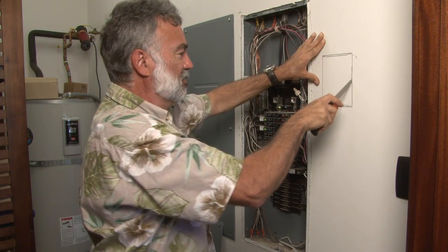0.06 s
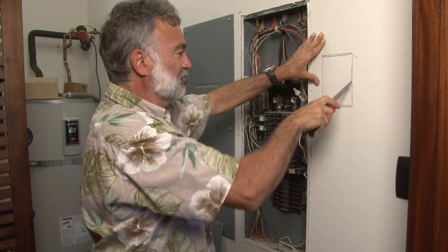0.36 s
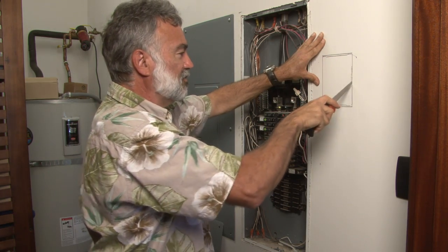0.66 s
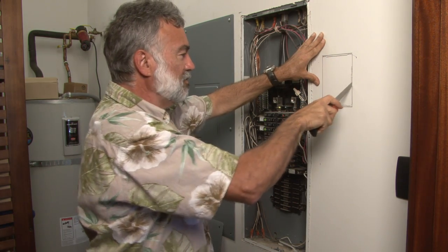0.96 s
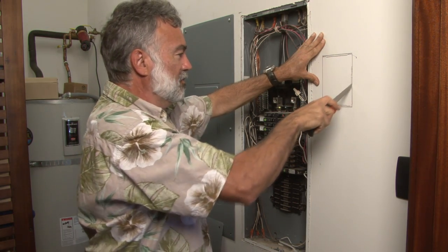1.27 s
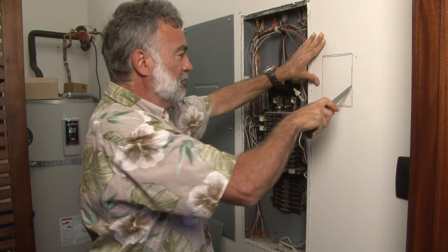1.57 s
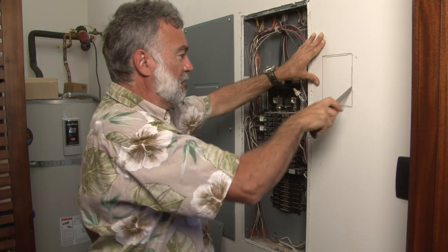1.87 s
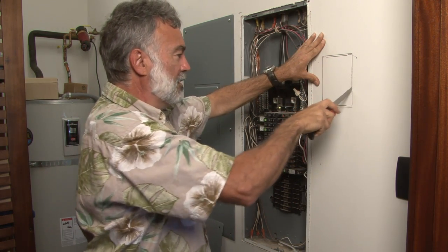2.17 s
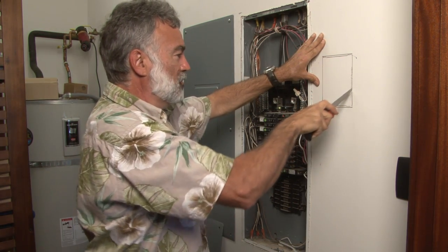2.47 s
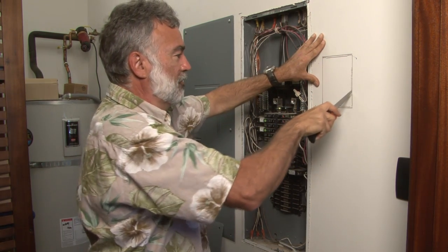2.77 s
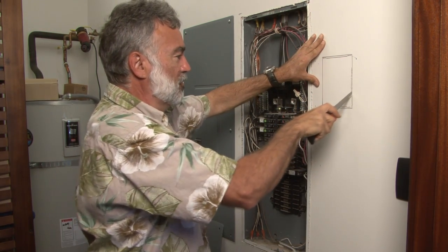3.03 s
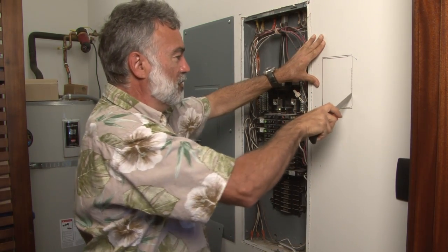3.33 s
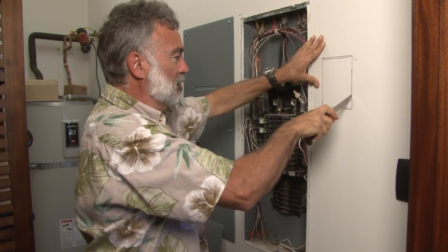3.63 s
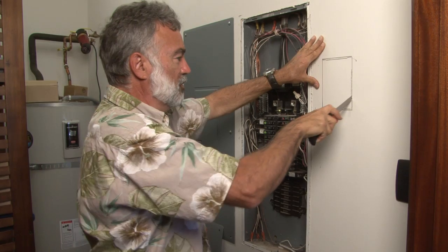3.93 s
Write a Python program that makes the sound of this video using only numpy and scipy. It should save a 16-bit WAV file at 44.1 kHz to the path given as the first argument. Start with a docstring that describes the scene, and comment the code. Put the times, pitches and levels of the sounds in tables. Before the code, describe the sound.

Close up in a small room, a hand saw works quickly through drywall. Louder cutting strokes alternate with softer return strokes, mixing a crumbly scrape with the low, hollow thudding of the wall panel throughout.

```python
"""Rasping, booming strokes, a little over four cycles a second: a jab saw cuts wallboard in a closet.
Each tooth's impact crumbles the gypsum and excites the modes of the panel; the scraping rings the blade,
and stick-slip friction sets the whole panel booming. Two larger crumbs snap off; a faint rumble lies below.
One close microphone feeds two channels at different gains, and the hotter one overloads."""
import sys
import numpy as np
from scipy import signal
from scipy.io import wavfile
from scipy.ndimage import uniform_filter1d

SR = 44100
rng = np.random.default_rng(int(sys.argv[2]) if len(sys.argv) > 2 else 0)


def output_pcm(signal):
    """Save a mono or channel-first signal as 16-bit PCM at the path in sys.argv[1].

    Samples are clipped to [-1, 1] before scaling.
    """
    pcm = np.clip(np.atleast_2d(signal).T, -1, 1) * 32767
    wavfile.write(sys.argv[1], SR, np.round(pcm).astype(np.int16))


N = 176400
T = np.arange(N) / SR

# All levels in the tables are relative.
# Spectrum of the background rumble: f/Hz, level/dB
RUMBLE_SPECTRUM = [(15, -8.5), (35, -23), (70, -11.5), (150, -12.5), (500, -33.5), (2000, -47),
                   (16000, -64)]
# Cutting and return strokes: start t/s, fastest t/s, fade t/s, grit level/dB, knock level/dB,
# hollow ring level/dB, boom level/dB, boom delay after the fastest moment t/s
CUT_STROKES = [(0.047, 0.086, 0.021, -34.0, -24, -33, -15, 0.017),
               (0.259, 0.308, 0.027, -28, -15.5, -19.5, -6, 0.027),
               (0.488, 0.55, 0.029, -32.5, -17, -26.5, -15.0, -0.015),
               (0.741, 0.788, 0.02, -29, -18.5, -25.5, -13.5, 0.0018),
               (0.955, 1.006, 0.027, -32.5, -19, -21.0, -10.5, 0.021),
               (1.183, 1.235, 0.032, -28, -15.5, -18, -8, 0.018),
               (1.426, 1.473, 0.032, -36, -25.5, -27, -11, -0.0032),
               (1.663, 1.705, 0.026, -29, -16.5, -21.5, -7.5, 0.013),
               (1.886, 1.94, 0.022, -28.5, -16.5, -15, -10, 0.0021),
               (2.125, 2.169, 0.02, -31, -21, -26.5, -14, -0.014),
               (2.354, 2.409, 0.027, -31.0, -18.5, -18.0, -18.5, 0.0003),
               (2.592, 2.645, 0.026, -30.5, -16.5, -18.5, -7.5, 0.0015),
               (2.83, 2.878, 0.029, -31.5, -19, -19, -7.5, -0.015),
               (3.057, 3.124, 0.027, -33.5, -22.5, -35.5, -15.5, -0.0021),
               (3.312, 3.349, 0.021, -30.5, -16, -22.0, -11.5, 0.024),
               (3.536, 3.583, 0.023, -31.5, -17.0, -20, -14, 0.012),
               (3.78, 3.808, 0.023, -31.5, -22, -29, -16, 0.016)]
RETURN_STROKES = [(0.146, 0.19, 0.028, -40.5, -25, -32.5, -10.5, 0.016),
                  (0.386, 0.423, 0.043, -37.5, -23.5, -24, -8.0, 0.015),
                  (0.618, 0.657, 0.035, -43, -29.5, -37.5, -23.5, 0.0076),
                  (0.841, 0.879, 0.028, -37.0, -22.5, -30.5, -13, 0.016),
                  (1.074, 1.117, 0.034, -38, -25.5, -26, -8.5, 0.017),
                  (1.311, 1.346, 0.035, -38, -20, -30, -13.5, 0.01),
                  (1.544, 1.571, 0.023, -42.0, -32, -31.5, -20.0, -0.0038),
                  (1.768, 1.805, 0.033, -36, -23.5, -28.5, -17.5, 0.018),
                  (1.996, 2.039, 0.037, -39.5, -25, -24, -7.5, 0.02),
                  (2.241, 2.274, 0.031, -41.5, -22.5, -40, -11.5, 0.018),
                  (2.474, 2.52, 0.029, -39.5, -24.5, -23.5, -19.0, 0.0011),
                  (2.714, 2.752, 0.038, -40.5, -24.5, -26.0, -10.5, 0.018),
                  (2.938, 2.98, 0.036, -38.5, -22.5, -27, -13.0, 0.0066),
                  (3.191, 3.227, 0.028, -47, -29, -37.5, -22.5, 0.012),
                  (3.414, 3.454, 0.032, -39.5, -24, -24.5, -19.0, -0.032),
                  (3.651, 3.681, 0.019, -41, -30, -32.5, -25.5, 0.021),
                  (3.896, 3.931, 0.03, -43, -35.5, -39.5, -19.5, 0.0043)]
# Spectra of crumbling gypsum in each direction: f/Hz, level/dB
CUT_GRIT_SPECTRUM = [(100, -2), (700, 4), (1300, 1.5), (1850, 3), (2600, -4), (3600, -8.5), (5000, -9.5),
                     (7000, -14.5), (9500, -20.5), (13000, -12.5), (16000, -21.5)]
RETURN_GRIT_SPECTRUM = [(100, -18), (700, 7), (1300, 1), (1850, -1.5), (2600, -6), (3600, -8), (5000, -8.5),
                        (7000, -12.5), (9500, -18), (13000, -11), (16000, -20)]
# Modes of the steel blade: f/Hz, level/dB
BLADE_MODES = [(1556, -66.5), (1658, -72.5), (1760, -45.5), (1825, -45.5), (2030, -48), (2186, -71.5),
               (2369, -59.5), (2541, -55), (2654, -47)]
# Modes of the panel: f/Hz, level/dB, T60/s
PANEL_MODES = [(116.4, -28, 0.06), (164, -18, 0.13), (177.1, 3, 0.38), (210, -4.5, 0.066),
               (249.5, -6, 0.19), (315.4, -3, 0.033), (305.6, 4.5, 0.04), (370.4, -5.5, 0.076),
               (466.4, -3, 0.14), (572.5, -4, .14), (643, 1.5, 0.055), (703, -14, 0.17),
               (752.3, -8.5, 0.092), (830, -5.5, 0.061), (944.3, -18, 0.25)]
# Spectrum of the panel's dull thud: f/Hz, level/dB
THUD_SPECTRUM = [(20, -39), (65, -12), (130, -4.5), (300, 4.5), (550, -2.5), (800, -13), (1200, -19),
                 (2000, -28), (4000, -49), (16000, -69)]
# Reverberation time of the closet: f/Hz, T60/s
CLOSET_DECAY = [(100, 0.68), (500, 0.11), (2000, 0.32), (6000, 0.21), (16000, 0.067)]
# Spectrum of the board's core breaking: f/Hz, level/dB
CRUNCH_SPECTRUM = [(60, -36.5), (200, 6), (320, 2.5), (450, 1), (600, 4), (800, -9.5), (1100, -15),
                   (1600, -26.5), (3000, -36), (16000, -66)]
# Larger crumbs snapping off: t/s, level/dB
CRUMB_SNAPS = [(1.488, -30), (2.778, -39)]

CUT_LEAD_S, RETURN_LEAD_S, GRIT_LEAD_S = .0057, .0039, .0059  # knocks and grit peak before top speed
GRIT_ROOM_DB, KNOCK_ROOM_DB = -6, -14  # reverberant relative to direct sound


def amp(db):
    """Amplitude ratio for a level in decibels."""
    return 10 ** (np.asarray(db) / 20)


def unit(x):
    """Normalisation to an rms of 1."""
    return x / np.sqrt(np.mean(x ** 2) + 1e-20)


def read(points, hz):
    """Interpolation on a logarithmic frequency axis."""
    f, value = np.transpose(points)
    return np.interp(np.log(hz + 1), np.log(f + 1), value)


def ring(x, response):
    """Convolution with an impulse response of unit energy."""
    return signal.fftconvolve(x, response / np.linalg.norm(response))[:N]


def colour(x, spectrum):
    """Minimum-phase filtering to the given spectral shape."""
    log_gain = np.log(amp(read(spectrum, abs(np.fft.fftfreq(4096, 1 / SR)))))
    transfer = np.exp(np.conj(signal.hilbert(log_gain)))
    return ring(x, np.fft.ifft(transfer).real[:2048])


def drift(size):
    """Random fluctuation of rms 1, smoothed over size samples."""
    return unit(uniform_filter1d(uniform_filter1d(rng.standard_normal(N), size), size))


def rumble():
    """Stationary noise with its energy at low frequencies."""
    return amp(-29) * colour(rng.standard_normal(N), RUMBLE_SPECTRUM)


def swell(strokes, levels_db, catch_db, power=1, lead_s=0, catch_s=.016):
    """Stroke envelopes add in energy: the teeth catch, the sound swells to a peak and dies away."""
    energy = np.zeros(N)
    for (start, fastest, fade, *_), db in zip(strokes, levels_db):
        peak = fastest - lead_s
        catch = np.clip((T - start) / catch_s + .5, 0, 1)
        rise = amp(catch_db * np.clip((peak - T) / (peak - start), 0, 1))
        fall = np.exp(-.5 * (np.maximum(T - peak, 0) / fade) ** 1.8)
        energy += (amp(db) * (catch * rise * fall) ** power) ** 2
    return np.sqrt(energy)


def teeth(effort, top_hz, slowest=.45, jitter=.22, spread_db=6):
    """An impulse train, one click a tooth, whose rate is proportional to blade speed."""
    speed = slowest + (1 - slowest) * effort
    passed = np.cumsum(top_hz * speed * np.exp(jitter * drift(size=120))) / SR
    strikes = np.diff(np.floor(passed), prepend=0) > 0
    clicks = strikes * amp(spread_db * np.clip(rng.standard_normal(N), -2, 2))
    local_rms = np.sqrt(abs(uniform_filter1d(clicks ** 2, size=1600)) + 1e-6)
    return clicks / local_rms


def grit(bites, grains_per_s=22000, spread_db=2, crumble_s=.0043, steady=.65):
    """Brittle fracture: gypsum crumbles in tiny grains, most strongly just after each bite."""
    crumble = unit(signal.lfilter([1], [1, -np.exp(-1 / (crumble_s * SR))], bites))
    grains = rng.standard_normal(N) * (rng.random(N) < grains_per_s / SR)
    grains *= amp(spread_db * rng.standard_normal(N))
    return unit(grains * (steady + (1 - steady) * crumble))


def blade(scrape, t60_s=.11):
    """Resonance: scraping excites the damped modes of the steel blade."""
    t = T[:SR // 4]
    modes = sum(amp(db - 60 * t / t60_s) * np.sin(2 * np.pi * (hz * t + rng.random()))
                for hz, db in BLADE_MODES)
    return amp(-9.5) * ring(scrape, modes)


def shifting_timbre(rasp, depth_db=2):
    """Spectral modulation: the colour of the rasp shifts as the blade moves through the cut."""
    bands = signal.stft(rasp, nperseg=256)[2]
    patches = uniform_filter1d(rng.standard_normal(bands.shape), size=3, axis=0)
    patches = unit(uniform_filter1d(patches, size=16, axis=1))
    return signal.istft(bands * amp(depth_db * (patches - .5)), nperseg=256)[1][:N]


def panel(force):
    """Impact excitation: tooth knocks give a dull thud and ring the modes of the board."""
    t = T[:SR // 3]
    modes = sum(amp(db - 60 * t / t60) * np.sin(2 * np.pi * (hz * t + rng.random()))
                for hz, db, t60 in PANEL_MODES)
    return amp(2) * ring(force, modes) + amp(-4) * colour(force, THUD_SPECTRUM)


def hollow_ring(drive, hz=361.4, wander_hz=4.96, decay_s=.006):
    """Forced vibration: one panel mode sings with the rubbing and lingers briefly after it."""
    pole = np.exp(-1 / (decay_s * SR))
    envelope = signal.lfilter([1 - pole], [1, -pole], drive)
    cycles = np.cumsum(hz + wander_hz * drift(size=500)) / SR
    return amp(2) * envelope * np.sqrt(2) * np.sin(2 * np.pi * cycles)


def closet(x, first_echo_s=.003):
    """Reverberation: dense reflections from near walls, each band decaying at its own rate."""
    n = SR // 2
    echoes = rng.standard_normal(n) * (rng.random(n) < .1) * (T[:n] > first_echo_s)
    hz, t, bands = signal.stft(echoes, SR, nperseg=256)
    decay = amp(-60 * t / read(CLOSET_DECAY, hz)[:, None])
    return ring(x, signal.istft(bands * decay, SR, nperseg=256)[1])


def saw(strokes, spectrum, teeth_hz, catch_db, lead_s, knock_cutoff_hz):
    """Common excitation: in the strokes of one direction, the same teeth drive rasp and knocks."""
    grit_db, knock_db, hollow_db = np.transpose(strokes)[3:6]
    effort = swell(strokes, np.zeros(len(strokes)), catch_db)
    bites = teeth(effort, teeth_hz)
    scrape = grit(bites) * swell(strokes, grit_db, catch_db, lead_s=GRIT_LEAD_S)
    rasp = shifting_timbre(colour(scrape, spectrum) + blade(scrape))
    force = bites - uniform_filter1d(bites, size=600)  # the steady push makes no sound
    force *= swell(strokes, knock_db, catch_db, power=.92, lead_s=lead_s)
    knocks = panel(signal.lfilter(*signal.butter(1, knock_cutoff_hz, fs=SR), force))
    room = closet(amp(GRIT_ROOM_DB) * rasp + amp(KNOCK_ROOM_DB) * knocks)
    return rasp + knocks + hollow_ring(swell(strokes, hollow_db, catch_db)) + room


def crunch(width_s=.02):
    """Fracture of the core: a burst of noise where each cutting stroke knocks hardest."""
    envelope = sum(amp(knock_db) * np.exp(-((T - fastest + CUT_LEAD_S) / width_s) ** 2)
                   for _, fastest, _, _, knock_db, *_ in CUT_STROKES)
    burst = amp(-2.5) * colour(envelope * rng.standard_normal(N), CRUNCH_SPECTRUM)
    return burst + amp(KNOCK_ROOM_DB) * closet(burst)


def boom(strokes, stretch=1, hz=119.4, sag_hz_per_s=69.4, wander_hz=5):
    """Stick-slip friction locks to the lowest panel mode, whose pitch sags as the push eases."""
    rise_s, fall_s = .023 * stretch, .037 * stretch
    wander = wander_hz * drift(size=700)
    out = np.zeros(N)
    for _, fastest, *_, db, delay in strokes:
        near = abs(T - fastest - delay) < .15
        t = T[near] - fastest - delay
        cycles = np.cumsum(hz - sag_hz_per_s * t + wander[near]) / SR + rng.random()
        envelope = np.where(t < 0, np.exp(-(t / rise_s) ** 2), 1 / np.cosh(1.75 * t / fall_s))
        out[near] += amp(db) * np.sqrt(2) * envelope * np.sin(2 * np.pi * cycles)
    return out


def snaps(decay_s=.00072):
    """Sudden fracture: larger crumbs break away with short, bright cracks."""
    envelope = sum(amp(db) * (T >= start) * np.exp(-abs(T - start) / decay_s)
                   for start, db in CRUMB_SNAPS)
    crack = colour(envelope * rng.standard_normal(N), [(500, -18), (4000, -7), (7500, 12), (16000, -3)])
    return crack + amp(GRIT_ROOM_DB) * closet(crack)


def scene():
    """Superposition: all sources sum at one microphone, which feeds both channels."""
    cuts = saw(CUT_STROKES, CUT_GRIT_SPECTRUM, teeth_hz=260, catch_db=-14,
               lead_s=CUT_LEAD_S, knock_cutoff_hz=830)
    cuts += boom(CUT_STROKES) + crunch()
    returns = saw(RETURN_STROKES, RETURN_GRIT_SPECTRUM, teeth_hz=341.8, catch_db=-6,
                  lead_s=RETURN_LEAD_S, knock_cutoff_hz=594)  # teeth sliding backwards knock more dully
    mic = rumble() + cuts + returns + boom(RETURN_STROKES, stretch=1.21) + snaps()
    mic = signal.lfilter(*signal.butter(1, 20, "high", fs=SR), mic)
    return amp(2) * np.array([mic, mic])


def record(dry, right_gain_db=7, cutoff_hz=15800):
    """Clipping: the hotter right channel overloads; a low-pass filter then limits the bandwidth."""
    clipped = np.clip(dry * amp([[0], [right_gain_db]]), -1, 1)
    lowpass = signal.firwin(511, cutoff_hz, window=("kaiser", 9), fs=SR)
    return signal.oaconvolve(clipped, lowpass[None], "same")


dry = scene()
out = record(dry)
output_pcm(out)
```